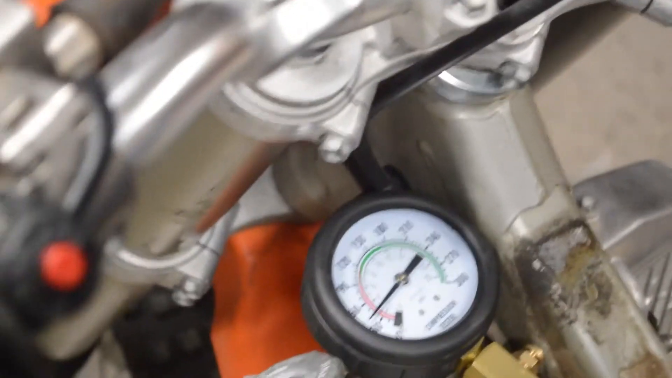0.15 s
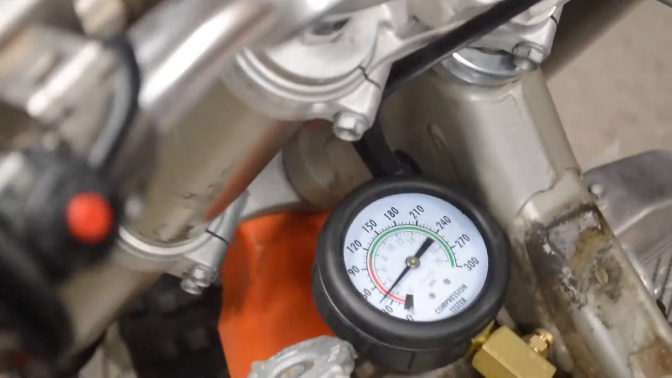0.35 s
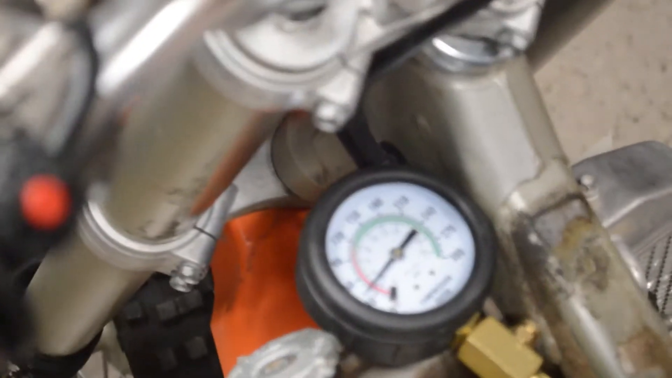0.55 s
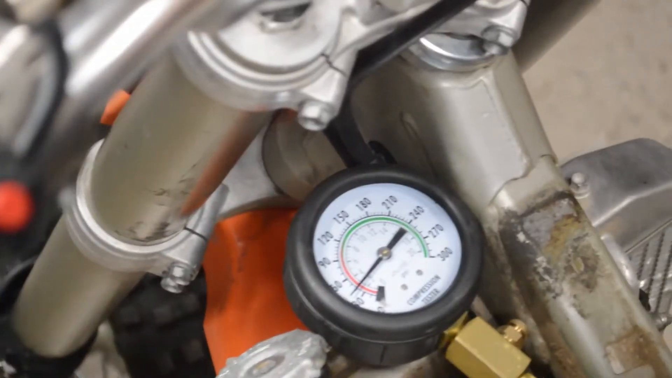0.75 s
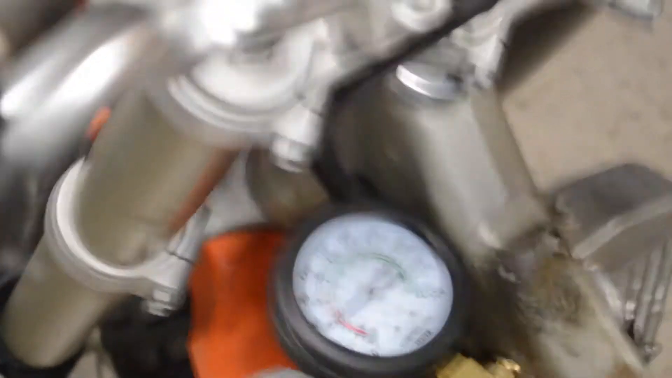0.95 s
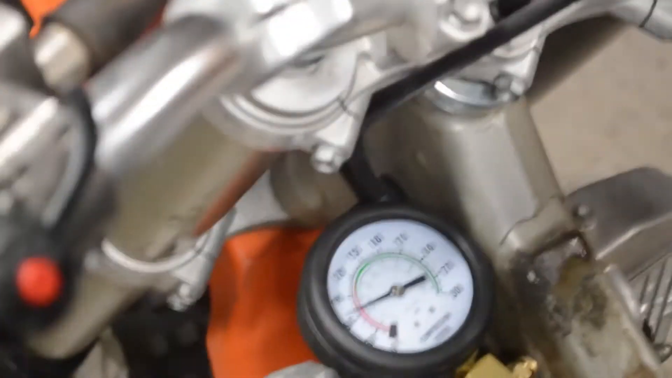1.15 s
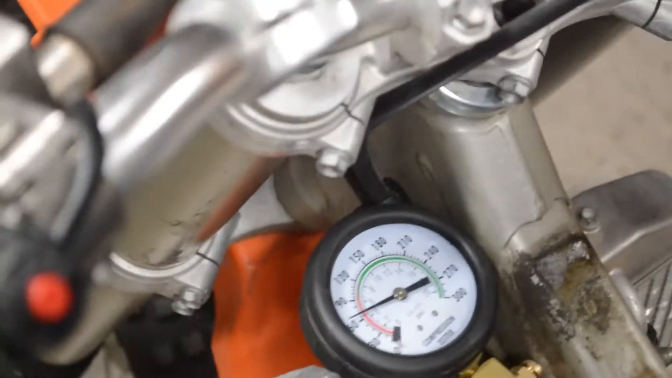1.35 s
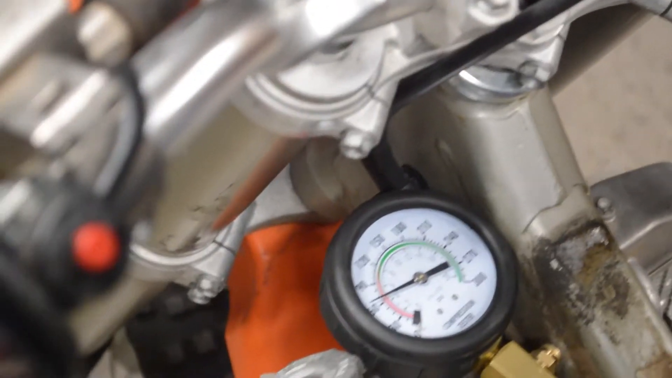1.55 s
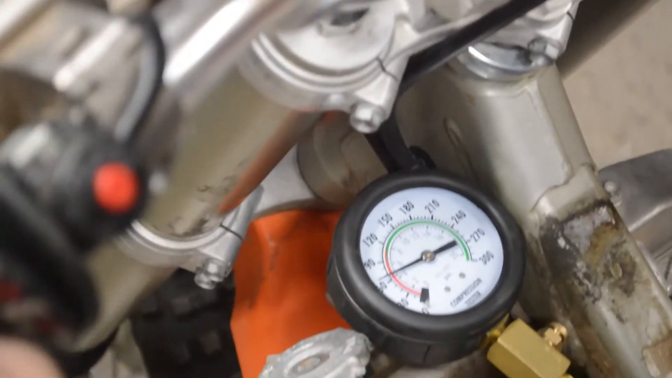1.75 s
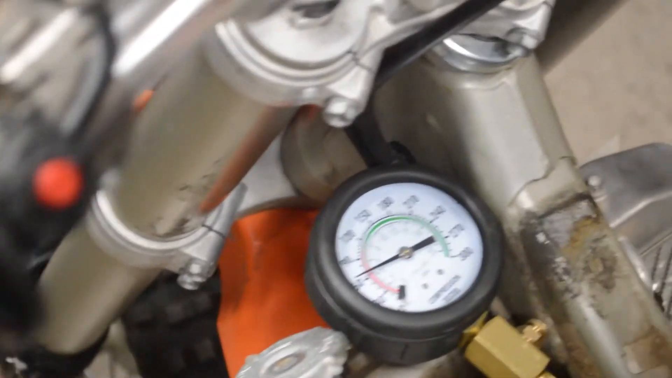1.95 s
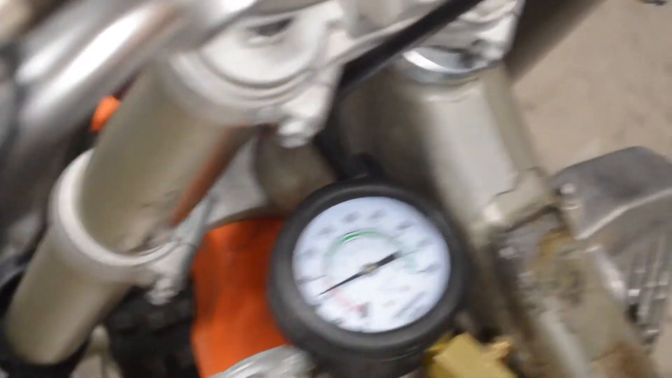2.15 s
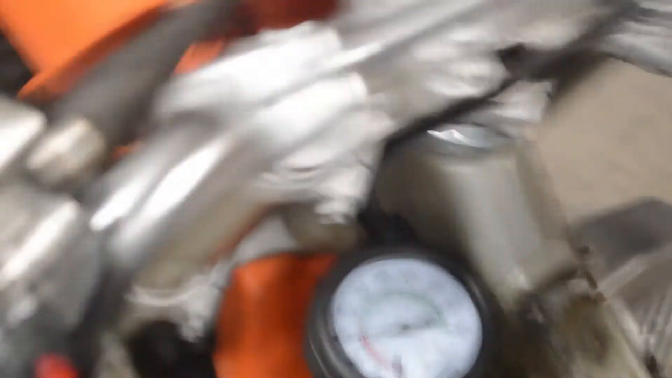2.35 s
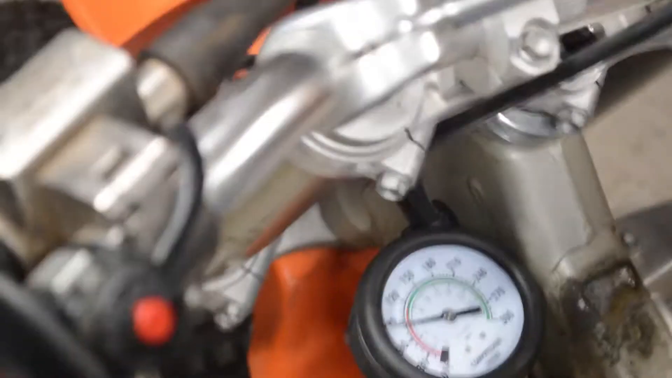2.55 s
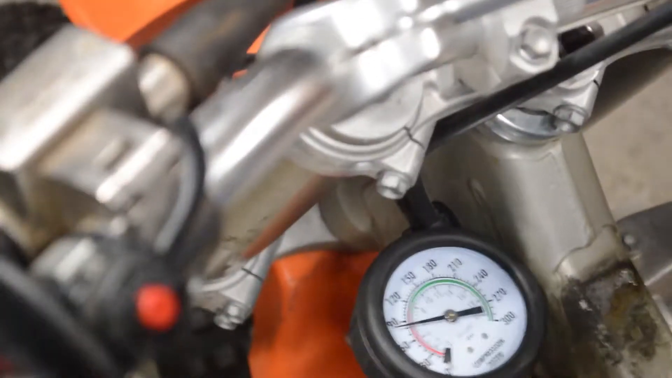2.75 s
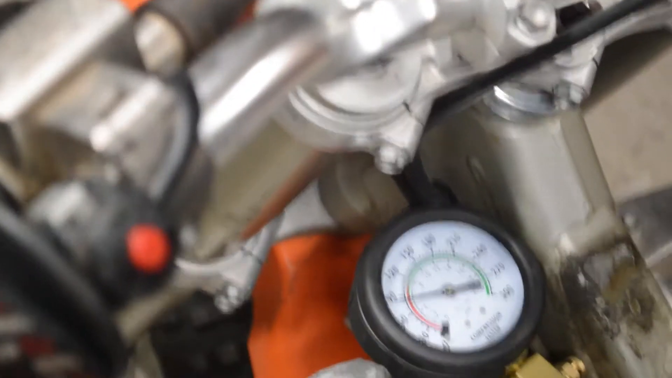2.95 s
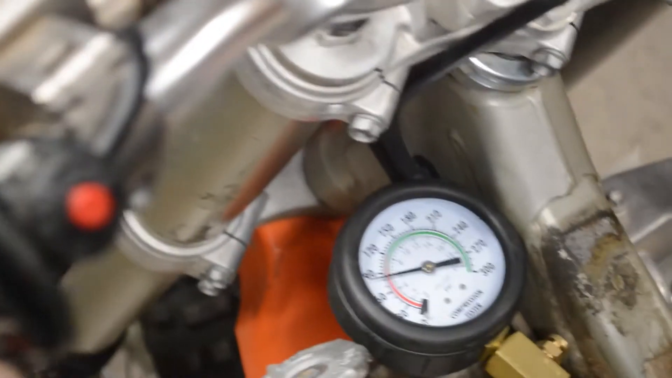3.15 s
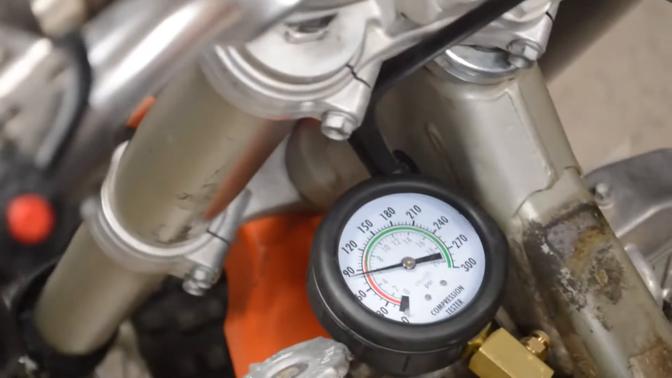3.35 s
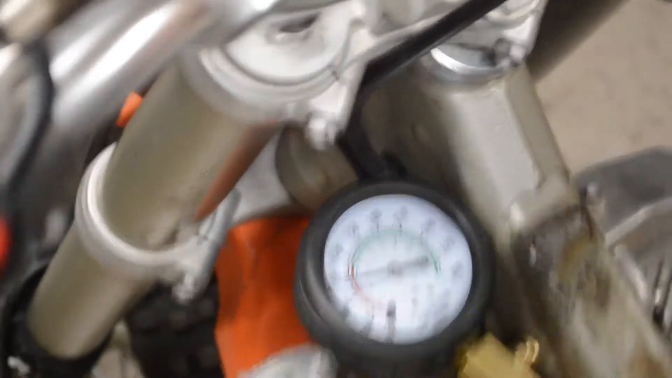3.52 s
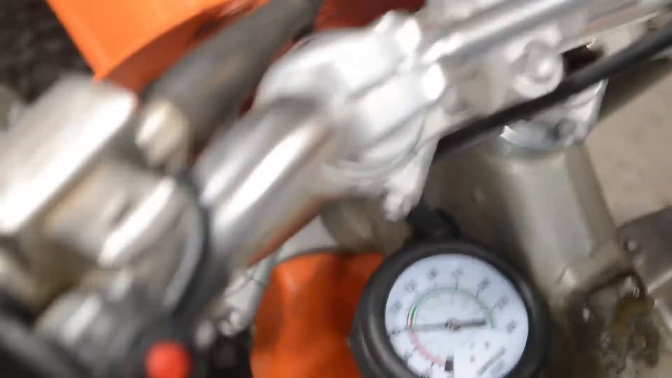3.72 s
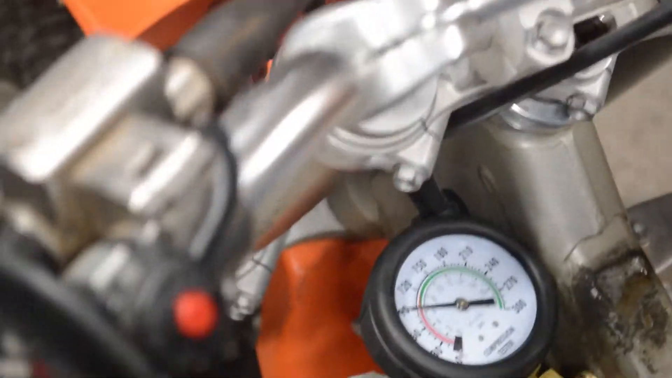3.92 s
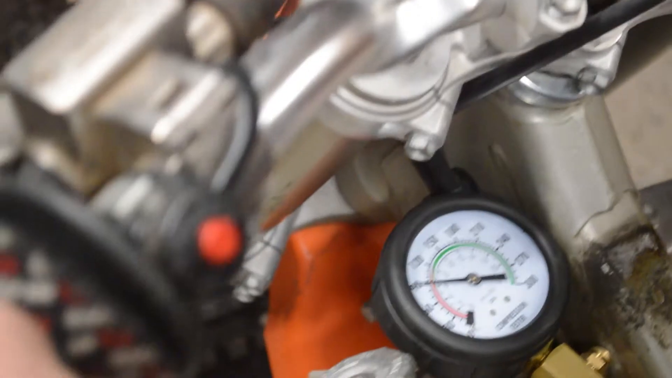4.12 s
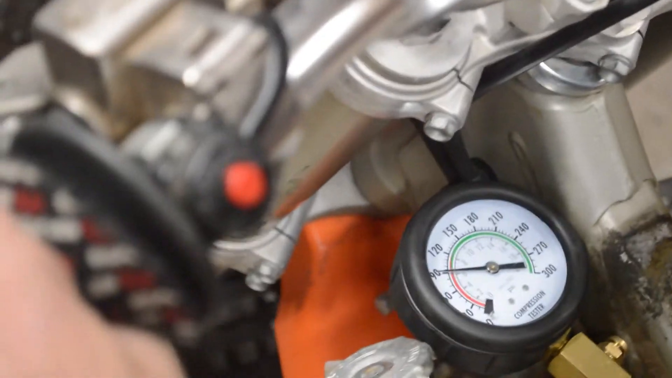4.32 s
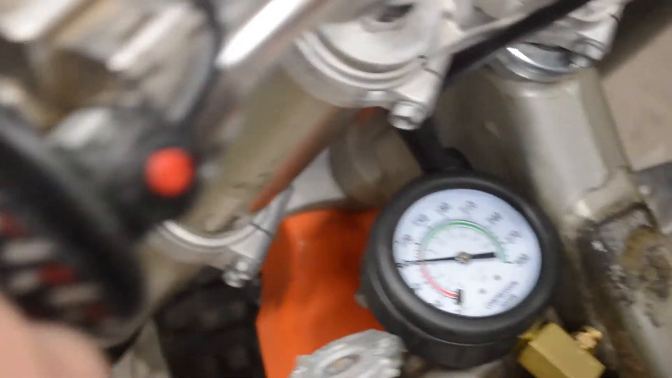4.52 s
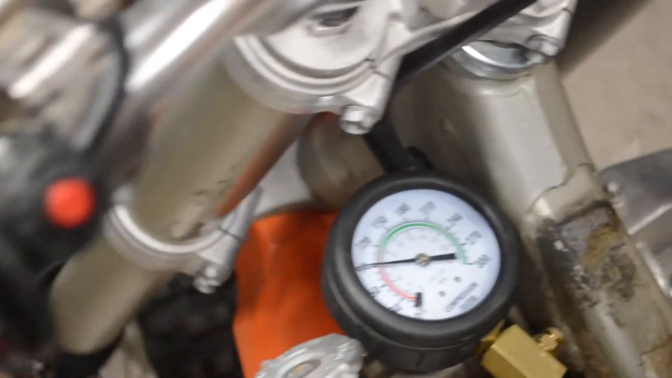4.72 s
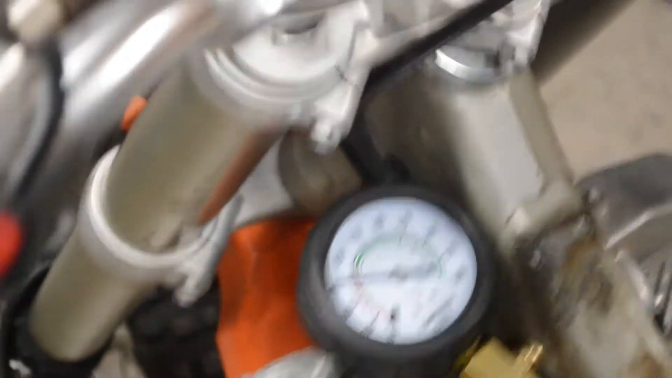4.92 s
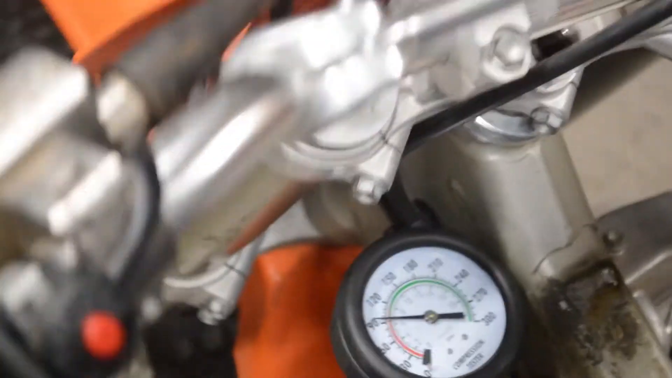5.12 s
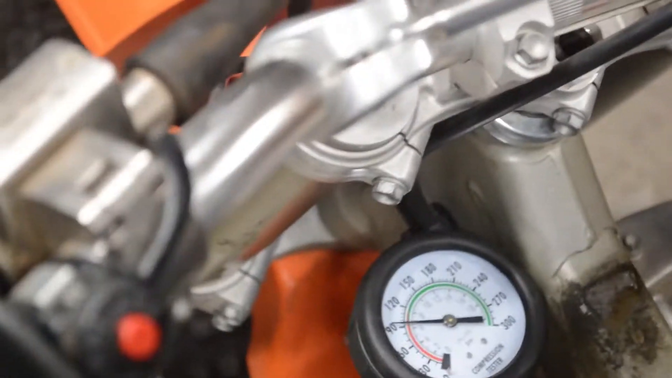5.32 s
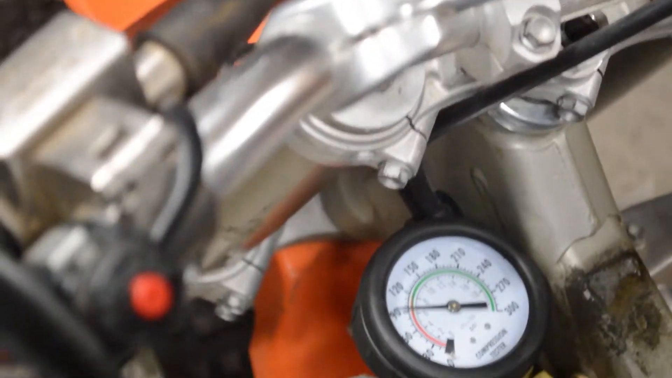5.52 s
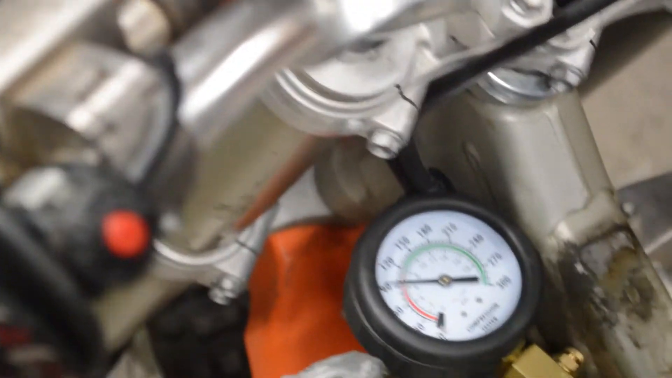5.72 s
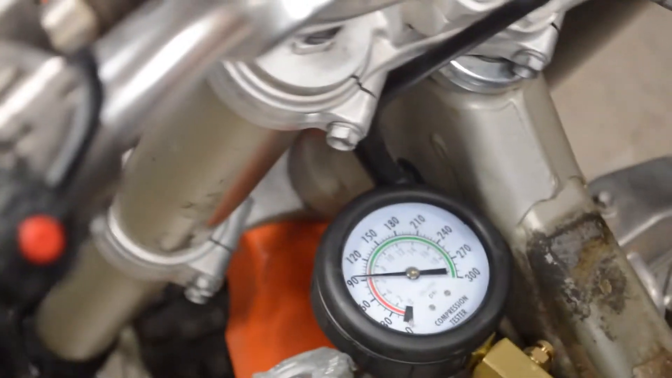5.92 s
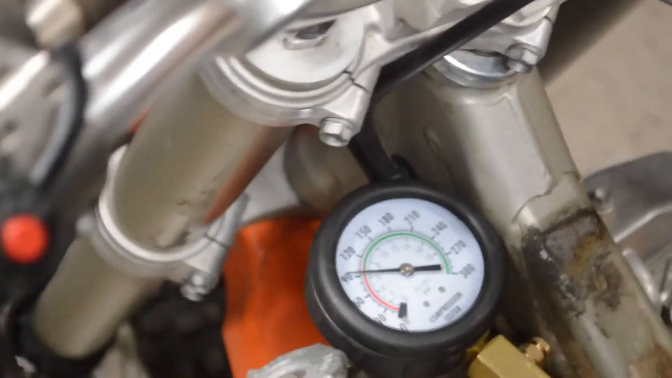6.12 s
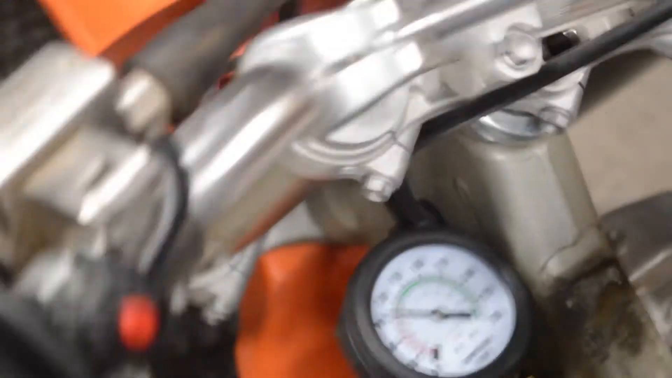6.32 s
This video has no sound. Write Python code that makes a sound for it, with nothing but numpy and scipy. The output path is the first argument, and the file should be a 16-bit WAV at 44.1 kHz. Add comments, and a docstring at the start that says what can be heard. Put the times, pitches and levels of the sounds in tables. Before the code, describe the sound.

A small motorcycle engine is kicked over again and again in a garage, each burst of chuffing puffs and gear rattle dying without starting.

```python
"""Kicking over a small engine in a garage

The tail of one kick and five more are heard; the engine never fires. Air puffs ring the exhaust pipe, and grow
slower and weaker as the crank runs down. Filtered noise makes the gear rattle, frame creaks and singing spring;
short noise bursts through damped resonances make clicks, knocks and clanks. A wavering low hum, faint air and the
echo of the garage lie behind. The microphone is close, and the loudest moments overload its input."""
import sys
import numpy as np
from scipy import signal
from scipy.fft import rfft, irfft
from scipy.io import wavfile
from scipy.ndimage import uniform_filter1d

SR = 44100
rng = np.random.default_rng(int(sys.argv[2]) if len(sys.argv) > 2 else 0)


def digitize_waveform(pressure):
    """Quantize a signal to 16-bit integers and store it at the path in sys.argv[1].

    Rows of a 2-D input are taken as channels; values are limited to [-1, 1].
    """
    field = np.atleast_2d(pressure).T
    bounded = np.clip(field, -1, 1)
    quanta = np.round(bounded * 32767).astype(np.int16)
    wavfile.write(sys.argv[1], SR, quanta)


def undo_db(level):
    """Turn decibels back into plain size, where 20 dB means ten times bigger."""
    steps = np.asarray(level, float) / 20
    return 10 ** steps


N = 285327
T = np.arange(N) / SR  # time in seconds

# kicks of the lever: engage_s, crank_catches_s, creak_db at the catch, rattle_db, rattle_t60_s (time to fall 60 dB)
KICK_TIMES = [(-.3, -.2, -40, -45.5, 1.29), (0.939, 0.995, -40, -45.5, 1.09),
              (2.279, 2.343, -32, -44, 1.13), (3.572, 3.633, -33.5, -43, 0.52),
              (4.94, 5.003, -34, -43, 1.23), (6.166, 6.237, -39, -49, 0.96)]


def level(x, db):
    """Scale to an rms level."""
    return x * undo_db(db) / np.sqrt(np.mean(x ** 2))


def peak(x, db):
    """Scale to a peak level."""
    return x * undo_db(db) / np.abs(x).max()


def colour(x, points):
    """Shape the spectrum by (Hz, dB) points."""
    hz, db = np.transpose(points)
    f = np.fft.rfftfreq(len(x), 1 / SR) + 1  # + 1 avoids the log of zero
    gain = undo_db(np.interp(np.log(f), np.log(hz), db))
    return irfft(rfft(x) * gain, len(x))


def ring(x, hz, t60):
    """One resonance that dies by 60 dB in t60 seconds; a unit impulse rings with a peak near 1."""
    pole = np.exp(2j * np.pi * min(hz, .45 * SR) / SR - np.log(1000) / (t60 * SR))
    return signal.lfilter([1], [1, -pole], x).imag


def walk(rate):
    """A random wander: levels drawn every 1 / rate seconds, joined by slopes."""
    hold = int(SR / rate)
    steps = np.repeat(rng.standard_normal(N // hold + 1), hold)
    return 0.52 * uniform_filter1d(steps, hold)[:N]


def add(out, s, sound):
    """Mix a short sound in at a time in seconds."""
    i = int(s * SR)
    out[i:i + len(sound)] += sound[:N - i]


def grit(spread_db):
    """Noise of unequal grains, rms 1."""
    return level(rng.standard_normal(N) * undo_db(spread_db * rng.exponential(size=N)), 0)


def bump(s, db, swell_s, fade_s, hold_s=0):
    """A gain that swells by 60 dB in swell_s, holds and fades by 60 dB in fade_s."""
    before = (s - T) / max(swell_s, .002)
    after = np.maximum(T - s - hold_s, 0) / max(fade_s, .002)
    return undo_db(db - 60 * np.maximum(before, after))


def loudest(gains):
    """At each moment the strongest of several gains."""
    return np.max(list(gains), axis=0)


def exhaust():
    """A port opening pushes air and leaves a swirl, both ring the pipe; the case thumps and hiss leaks out directly."""
    # port openings, strong on the exhaust stroke: start_s, push_db, swirl_db (relative strengths)
    puffs = [(0.002, -10, -19.5), (0.052, -13, -20), (0.12, -18, -44), (0.19, -27, -27.5),
             (0.324, -60, -43), (0.388, -42, -47.5), (0.450, -53, -69), (0.999, -7, -10.5),
             (1.046, -6, -6.5), (1.098, -9.5, -14), (1.163, -9.5, -15.5), (1.196, -39, -17),
             (1.260, -14, -14), (1.293, -18.5, -38), (1.390, -20.5, -24.5), (1.441, -56, -33.5),
             (1.561, -35, -42), (2.337, -8, -9.5), (2.384, -8.5, -10), (2.440, -9.5, -11.5),
             (2.515, -11, -12), (2.611, -13, -17), (2.654, -31, -22.5), (2.746, -28, -68),
             (2.794, -30.5, -32.5), (2.883, -52, -45), (2.928, -59, -48), (3.631, -6, -11.5),
             (3.678, -6.5, -11.5), (3.735, -9, -11), (3.809, -11.5, -12.5), (3.911, -11, -21),
             (3.996, -30, -28), (4.098, -50, -46), (4.986, -7, -14), (5.040, -27, -10), (5.112, -8, -11.5),
             (5.209, -10, -35), (5.252, -17, -25), (5.339, -22.5, -30), (5.400, -31, -35),
             (5.504, -36.5, -63), (6.242, -7, -11.5), (6.288, -8.5, -10), (6.340, -9, -10),
             (6.408, -10, -15)]
    # exhaust pipe resonances: pitch_hz, level_db (relative), t60_s
    pipe_modes = [(57.5, -20, 0.092), (173.3, -17.5, 0.17), (238.9, -31, 0.06), (300.6, -2, 0.073),
                  (355, 1, 0.1), (404.8, 1.5, 0.065), (432.8, -2, 0.13), (498.7, 1.5, 0.056),
                  (566, -3.5, 0.046), (670, -0.5, 0.058), (795, -12, 0.11), (854.4, -4.5, 0.038),
                  (1133, -9, 0.011), (1189, -18.5, 0.1)]
    thump_hz, thump_t60_s = 231.3, 0.016
    thump_db, thump_per_db = -17.5, 0.67  # thump of a 0 dB puff; dB gained per dB of puff
    hiss_db, hiss_per_db = -14.5, 2  # the leak dies faster than the puff
    port_open = 0.852  # share of the time to the next opening
    t = T[:SR // 3]
    drive, hiss, thumps = np.zeros(N), np.zeros(N), np.zeros(N)
    push = np.exp(-t / 0.00018) / (0.00021 * SR)
    # case and air box resonate in series, so the thump swells before it dies
    thump = ring(push, thump_hz, thump_t60_s)
    thump = peak(ring(thump, thump_hz, thump_t60_s), 0)
    gaps = np.diff([row[0] for row in puffs], append=N / SR + 1)
    for (s, push_db, swirl_db), gap in zip(puffs, gaps):
        swirl, leak = rng.standard_normal((2, len(t)))
        # the piston shuts the port shortly before the next opening
        swirl = swirl * np.clip((gap * port_open - t) / 0.0046, 0, 1)
        swirl = swirl * np.exp(-t / 0.063) / np.sqrt(0.027 * SR / 2)
        puff_db = max(push_db, swirl_db)
        add(drive, s, undo_db(push_db) * push + undo_db(swirl_db) * swirl)
        add(thumps, s, undo_db(thump_db + thump_per_db * puff_db) * thump)
        add(hiss, s, undo_db(hiss_db + hiss_per_db * puff_db) * leak * np.exp(-t / 0.058))
    pipe = np.zeros(N)
    for k, (hz, db, t60) in enumerate(pipe_modes):
        pipe += (-1) ** k * undo_db(db - 12) * ring(drive, hz, t60)  # alternate modes are flipped
    return pipe + thumps + colour(hiss, [(300, 10.5), (1000, -4.5), (3000, -6), (8000, -19.5), (15000, -32)])


def gear_rattle():
    """Gears rattle finely after each kick and die away; lever and chain jingle with the same flickering noise."""
    # tone of the rattle: pitch_hz, density_db (relative, per Hz)
    rattle_tone = [(530, -35.5), (900, 5.5), (1550, -9.5), (2330, -3.5), (4860, -8), (7960, -20),
                   (8980, -18.5), (10200, -23), (12600, -29), (16000, -60)]
    # lever and chain jingling apart from the spinning gears: peak_s, level_db, swell_s, fade_s (times for 60 dB)
    jingles = [(.48, -68, 0.67, 2.1), (0.611, -63.5, .01, 4.5), (0.935, -48, .25, 0.051),
               (1.68, -80, 2, 2.7), (1.92, -63.5, 1.26, 1.2), (2.082, -60, .01, 0.17),
               (2.24, -60, 0.86, 0.37), (2.749, -65, 0.19, 0.4), (3.15, -68, 0.57, 0.84),
               (3.208, -64.5, .01, 1.6), (3.571, -63, 0.54, 0.085), (3.978, -49.5, 0.0084, 0.29),
               (4.59, -69, 2.1, 0.39), (4.79, -69, 2, 1.1), (4.936, -59, 0.37, 0.1), (5.68, -61, .01, .6),
               (5.722, -63.5, .05, 1.6), (5.978, -62.5, 0.16, 0.58), (6.166, -56, 0.25, .1)]
    spin_s = 0.099  # the gears rattle at full level this long
    rattle = level(colour(grit(2.2), rattle_tone), -2.45) * undo_db(2.65 * walk(90))
    gears = sum(bump(s + 0.00384, db, 0.023, t60, spin_s) for s, _, _, db, t60 in KICK_TIMES)
    return rattle * (gears + loudest(bump(*row) for row in jingles))


def clicks():
    """Metal clicks: a noise burst rings a broad damped resonance, with a shorter treble tick on top."""
    # lever, pawl and gears: start_s, peak_db, pitch_hz, tick_peak_db (levels at the source)
    metal_clicks = [(0.0397, -47, 4650, -52), (0.0954, -48, 6980, -50), (0.6288, -57, 6980, -53),
                    (0.8567, -70, 5560, -55), (0.8981, -51, 3490, -71), (0.9201, -52, 6030, -44),
                    (0.9379, -31, 4610, -56), (0.9977, -36, 5040, -43), (1.0226, -36, 2580, -35),
                    (1.1658, -38, 2670, -46), (1.3926, -52, 3490, -68), (1.8027, -55, 5940, -51),
                    (1.8783, -61, 5730, -54), (2.2024, -55, 5680, -72), (2.2431, -47, 3700, -58),
                    (2.2776, -35, 4570, -46), (2.3283, -33, 4390, -32), (2.3594, -29, 5990, -35),
                    (2.4411, -34, 3140, -55), (2.4708, -38, 5940, -39), (2.5157, -39, 3790, -46),
                    (2.6172, -43, 3790, -53), (2.7556, -54, 3140, -55), (2.8841, -57, 4180, -71),
                    (3.2072, -48, 6460, -50), (3.4213, -56, 5600, -49), (3.5587, -51, 5770, -63),
                    (3.5727, -39, 4390, -47), (3.6122, -29, 5250, -34), (3.6549, -28, 6890, -35),
                    (3.7079, -19, 5600, -25), (3.8156, -38, 2890, -49), (3.8863, -29, 5600, -28),
                    (3.9232, -41, 3620, -50), (3.9818, -35, 4440, -57), (4.102, -57, 4390, -58),
                    (4.9394, -38, 4650, -53), (4.9905, -39, 6070, -42), (5.0145, -33, 5600, -28),
                    (5.0276, -31, 4180, -37), (5.6815, -59, 5040, -50), (5.7214, -46, 4180, -54),
                    (6.1675, -42, 6980, -46), (6.1861, -56, 6850, -43), (6.201, -38, 4870, -51),
                    (6.2647, -34, 4480, -35), (6.2804, -37, 2800, -41), (6.4078, -32, 2670, -51)]
    faint_count, faint_db = 24, -73.5  # small ticks scattered by chance, starting from this level
    chance = rng.random((faint_count, 4))
    faint = [(a * N / SR, faint_db + 8 * b, 3000 + 3000 * c, faint_db - 8 * d) for a, b, c, d in chance]
    out, t = np.zeros(N), T[:SR // 8]
    treble = signal.butter(2, 6500, "highpass", fs=SR, output="sos")
    for s, db, hz, tick_db in metal_clicks + faint:
        noise = rng.standard_normal(len(t))
        body = ring(noise * np.exp(-t / .0013), hz, .0009)
        body = np.diff(ring(body, hz, .0009), prepend=0)  # the difference thins the bass
        tick = signal.sosfilt(treble, noise * np.exp(-t / .0006))
        add(out, s, peak(body, db))
        add(out, s, peak(tick, tick_db))
    return out


def knocks():
    """Dull knocks of boot and lever: a softened blow rings a low resonance and a clink."""
    # start_s, peak_db, pitch_hz, clink_peak_db (levels at the source)
    dull_knocks = [(0.655, -48.5, 205, -48.5), (0.717, -55, 205, -56), (0.828, -56, 584, -56),
                   (0.898, -44.5, 586, -49), (0.945, -33.5, 414, -36.5), (0.963, -29, 310, -57),
                   (1.885, -51.5, 268, -57), (1.94, -51, 810, -58), (1.979, -53, 870, -65),
                   (2.083, -48, 226, -49.5), (2.195, -55, 235, -53.5), (2.285, -26, 418, -42),
                   (2.308, -20.5, 460, -41), (2.9, -50, 363, -46), (3.043, -55.5, 506, -68),
                   (3.084, -59, 480, -71), (3.172, -55.5, 770, -75), (3.576, -34.5, 423, -49),
                   (3.598, -27, 413, -36), (4.508, -56, 576, -74), (4.552, -55, 355, -71),
                   (4.695, -79.5, 820, -53), (4.939, -32.5, 393, -57), (5.672, -54, 455, -62),
                   (5.719, -63, 750, -57.5), (5.964, -46, 760, -52), (6.127, -55, 815, -68),
                   (6.169, -40, 455, -47.5), (6.198, -27.5, 247, -50)]
    clink_hz, clink_t60_s = 1070, 0.016
    out, t = np.zeros(N), T[:SR // 8]
    for s, db, hz, clink_db in dull_knocks:
        noise = rng.standard_normal(len(t))
        blow = uniform_filter1d(noise, size=12) * np.exp(-t / 0.008)  # rubber and leather soften the contact
        clink = ring(blow, clink_hz, clink_t60_s)
        add(out, s, peak(ring(blow, hz, 0.026), db) + peak(clink, clink_db))
    return out


def clanks():
    """The lever engages or hits its stop: a short chatter of noise rings its metal resonances."""
    # strikes: start_s, strength_db (before the ringing)
    strike_times = [(0.936, -53), (2.278, -36.5), (2.328, -29.5), (2.882, -85), (3.573, -39.5),
                    (3.980, -39.5), (4.692, -57), (4.937, -61), (5.723, -58.5), (6.166, -46),
                    (6.264, -31.5)]
    # lever resonances: pitch_hz, level_db (relative), t60_s
    lever_modes = [(1750, -2, .012), (2290, -2, .024), (2800, -1, .012), (3600, -1, .012), (4250, -4, .013),
                   (4640, -5, .018), (5600, -4, .01)]
    strikes, t = np.zeros(N), T[:SR // 8]
    for s, db in strike_times:
        # the lever chatters against the stop for a moment
        chatter = rng.standard_normal(len(t)) * np.exp(-t / .04)
        add(strikes, s, undo_db(db) * chatter / np.sqrt(.02 * SR))
    return sum(undo_db(db) * ring(strikes, hz, t60) for hz, db, t60 in lever_modes)


def spring_song():
    """Stick-slip rubbing: each resonance is a wavering narrow band that breaks into chirps, over a little hiss."""
    # return spring resonances: multiple of the strongest pitch, level_db (relative), half_width_hz
    resonances = [(.45, -10, 110), (.718, -3, 180), (1, 1, 150), (1.145, -13, 220)]
    # the pitch sags under load: time_s, pitch_hz of the strongest resonance
    stretch = [(0.05, 12450), (0.5, 12680), (0.65, 12420), (1.4, 12660), (2.05, 12650), (2.18, 12420),
               (2.85, 12660), (3.25, 12480), (4.1, 12620), (4.65, 12560), (4.85, 12410), (5.3, 12690),
               (5.95, 12520), (6.4, 12600)]
    # the spring is plucked or rubbed: peak_s, gain_db, swell_s, fade_s (times for 60 dB)
    twangs = [(0, -62, 0.023, 0.42), (.1, -70.5, .01, 1.3), (.612, -69, 0.25, 1.7),
              (0.856, -65, 0.057, 0.19), (.92, -58, .01, 0.72), (1.038, -51, 0.39, 0.28),
              (1.3, -71, 2.5, 0.49), (1.803, -70, .005, 0.29), (2.2, -74, 0.73, 1.1),
              (2.305, -58, 0.032, 1.7), (2.749, -66.5, 0.14, .26), (3.208, -70, .005, 1.1),
              (3.42, -66, 0.0078, 0.23), (3.609, -57.5, 0.084, 1.3), (3.731, -53.5, 0.37, 0.42),
              (4.63, -83, 0.064, .6), (4.836, -71.5, .01, 0.51), (5.013, -51, 0.094, .7),
              (5.7, -64, .1, 0.38), (5.979, -69, .05, 1.1), (6.166, -69, 1.4, 1.1),
              (6.274, -54, 0.39, 0.41)]
    pitch_hz = np.interp(T, *np.transpose(stretch)) * (1 + .005 * walk(20))
    turns = np.cumsum(pitch_hz) / SR
    song = level(colour(grit(2.3), [(3000, -11), (7000, -4.5), (15000, -12)]), -1.5)
    for multiple, db, width_hz in resonances:
        narrow = signal.butter(2, width_hz, fs=SR, output="sos")
        slips = signal.sosfilt(narrow, grit(1.6) + 1j * grit(1.0))
        # turning the slow noise moves it up to the resonance
        band = level((slips * np.exp(2j * np.pi * multiple * turns)).real, db)
        song = song + band * undo_db(9 * walk(25) - 2.5)
    return song * loudest(bump(*row) for row in twangs)


def frame_creak():
    """Low flickering noise of the frame, growing under the boot until the crank catches, and between kicks."""
    # tone of the creak: pitch_hz, density_db (relative, per Hz)
    creak_tone = [(18, -69), (30, -34), (59, -22.5), (157, -14.5), (202, 0.5), (321, 0.5), (428, 5.5),
                  (926, 1), (1470, -28), (3000, -29), (3900, -28.5), (6600, -120)]
    # boot and frame creaking between kicks: peak_s, level_db, swell_s, fade_s (times for 60 dB)
    creaks = [(.45, -62, 0.36, 1.5), (.665, -57.5, 0.08, 0.43), (.935, -50.5, 0.4, 0.054),
              (1.65, -60, 0.9, 0.9), (1.952, -61, 1.4, 1.2), (2.082, -62, .02, 1.9),
              (2.95, -56, 0.49, 0.31), (3.126, -59, 0.63, 0.085), (3.2, -68.5, 0.47, 3.8),
              (4.51, -59.5, 0.2, 0.66), (4.705, -67.5, 0.044, 0.81), (4.93, -69, 1, .1),
              (5.55, -54, 0.66, 0.6), (5.72, -54.5, 0.07, 0.24), (5.8, -70, .3, 4),
              (5.965, -49.5, 0.0085, 0.36), (6.162, -60.5, .4, .05)]
    load_db_per_s = 153  # growth of the creak under the boot
    creak = level(colour(rng.standard_normal(N), creak_tone), -1.5) * undo_db(5.5 * walk(30))
    loaded = np.zeros(N)
    for s, catch, db, _, _ in KICK_TIMES:
        under_boot = (T >= s) * (T <= catch)
        loaded += under_boot * undo_db(db + load_db_per_s * np.minimum(T - catch, 0))
    return creak * (loaded + loudest(bump(*row) for row in creaks))


def hum():
    """A wavering low tone swells under each spin, then rings on faintly."""
    # swells: start_s, hold_s, level_db, after_ring_db
    swells = [(-.1, 0.084, -26.5, -61.5), (1.08, 0.04, -39, -59.5), (2.353, 0.27, -43, -66),
              (3.667, .19, -49.5, -66.5), (5.038, 0.1, -52, -70), (6.27, .07, -45, -75)]
    hum_hz, swell_s, fade_s, ring_s = 55.3, 0.27, 0.16, 1.6  # times for 60 dB
    gain = undo_db(-100)
    for s, hold, db, ring_db in swells:
        gain = gain + bump(s, db, swell_s, fade_s, hold)
        gain = gain + bump(s + hold + 0.11, ring_db, .3, ring_s)
    turns = np.cumsum(hum_hz + 2.2 * walk(3.01)) / SR
    return np.sqrt(2) * gain * np.sin(2 * np.pi * turns)


def garage(x):
    """Hard walls: a dense noise tail whose bands die at their own pace, fastest in the treble."""
    # echo bands: centre_hz, t60_s
    echo_bands = [(125, 0.47), (350, 0.53), (1000, 0.61), (3000, 0.63), (9000, 0.12)]
    t = T[:SR]
    tail = np.zeros(len(t))
    for hz, t60 in echo_bands:
        edges_hz = [hz / 1.686, min(hz * 1.524, .45 * SR)]
        band = signal.butter(2, edges_hz, "bandpass", fs=SR, output="sos")
        tail += signal.sosfilt(band, rng.standard_normal(len(t))) * undo_db(-60 * t / t60)
    tail *= np.clip((t - .004) / 0.02, 0, 1)  # echoes start after 4 ms and build up over 20 ms
    return signal.fftconvolve(x, tail / np.sqrt(np.sum(tail ** 2)))[:N]


def still_air():
    """Faint steady noise, shaped over the whole range of pitch."""
    # tone of the air: pitch_hz, density_db (relative)
    air_tone = [(18, -28), (30, -27), (69, 12), (195, -5.5), (355, -30), (1480, 2), (10400, -48),
                (12500, -25), (15000, -52)]
    return level(colour(rng.standard_normal(N), air_tone), -81.5)


def scene():
    """Engine and lever near the microphone, the garage behind, a wavering low hum and still air."""
    # small sources are weak in the bass: pitch_hz, gain_db
    radiation = [(30, -20), (60, -5), (100, -4), (150, -3.5), (190, -6), (250, 0.5), (15000, 0)]
    near = colour(exhaust() + clicks() + knocks() + clanks(), radiation)
    echo = undo_db(-12.5) * garage(near)
    mechanism = gear_rattle() + spring_song() + frame_creak()
    return (near + echo + mechanism + hum() + still_air())[None]


def top_cut(x):
    """Nothing passes above the cut-off."""
    return signal.sosfilt(signal.butter(12, 16460, fs=SR, output="sos"), x)


def record(dry):
    """The microphone input clips with a hard shoulder and the top is cut."""
    overload, top_hz = 0.072, 15800  # overload: the largest sample value the input passes
    clipped = dry / (1 + np.abs(dry / overload) ** 14.) ** (1 / 14.)
    low_pass = signal.ellip(8, .2, 60, top_hz, fs=SR, output="sos")
    mix = signal.sosfilt(low_pass, clipped)
    return top_cut(mix)


dry = scene()
out = record(dry)
digitize_waveform(out)
```